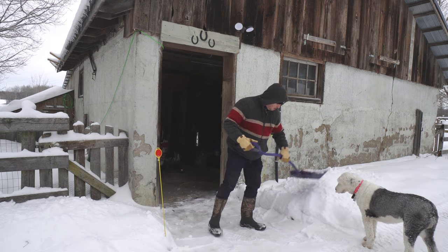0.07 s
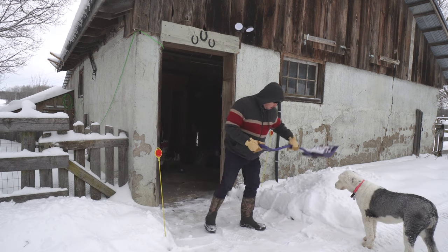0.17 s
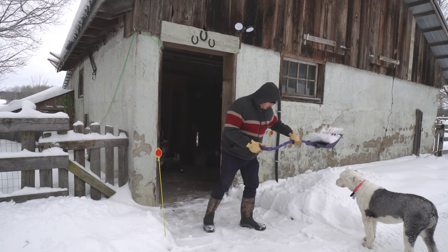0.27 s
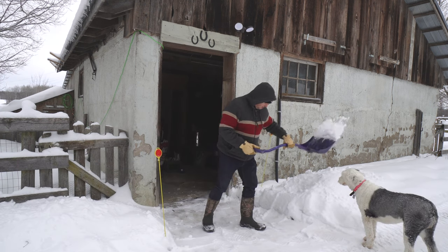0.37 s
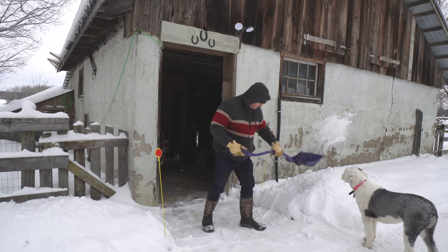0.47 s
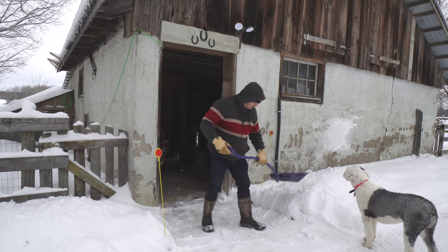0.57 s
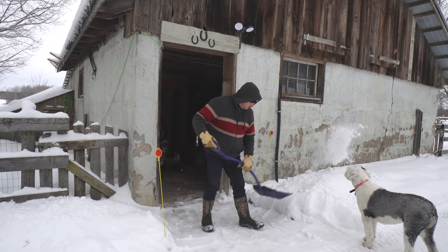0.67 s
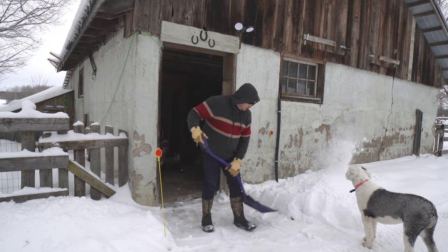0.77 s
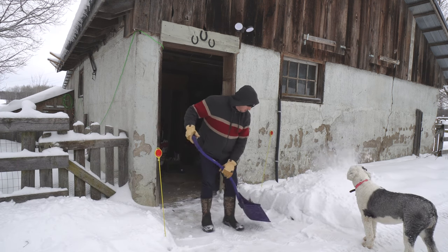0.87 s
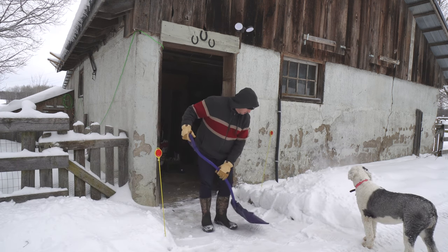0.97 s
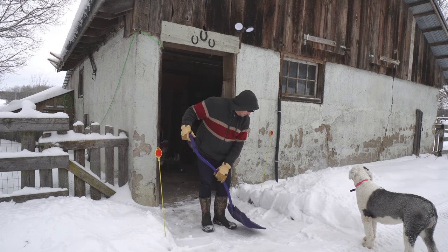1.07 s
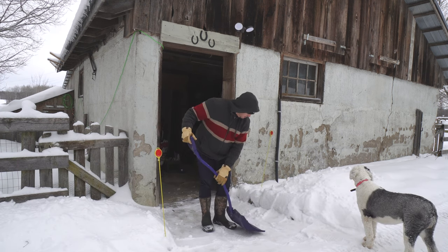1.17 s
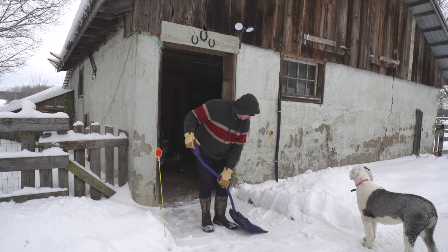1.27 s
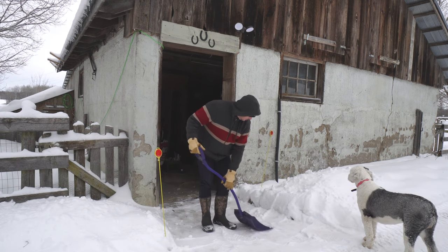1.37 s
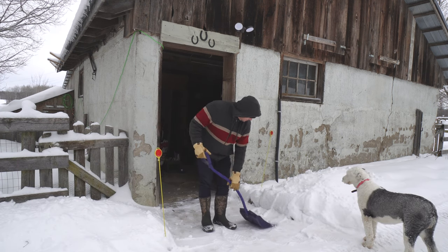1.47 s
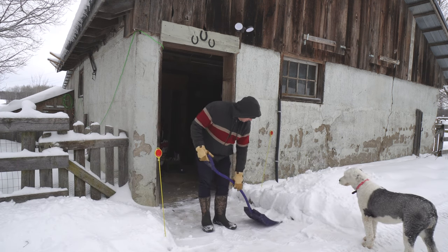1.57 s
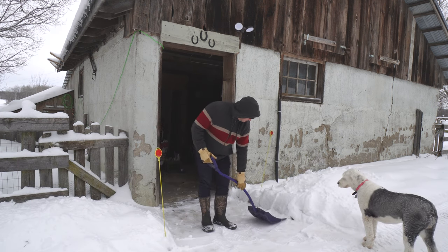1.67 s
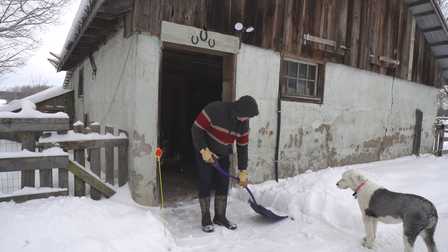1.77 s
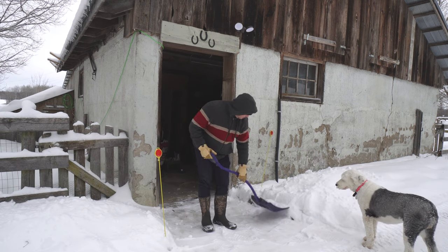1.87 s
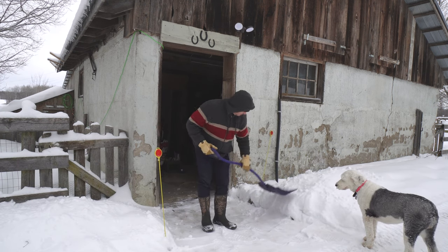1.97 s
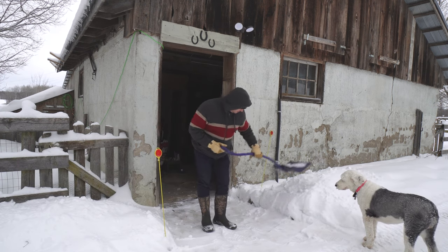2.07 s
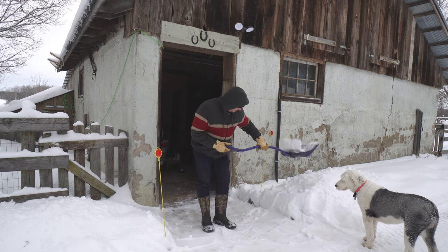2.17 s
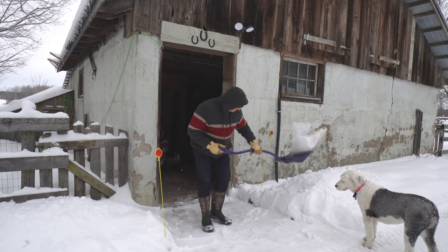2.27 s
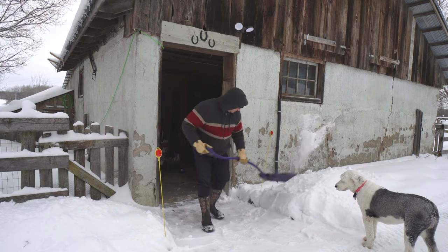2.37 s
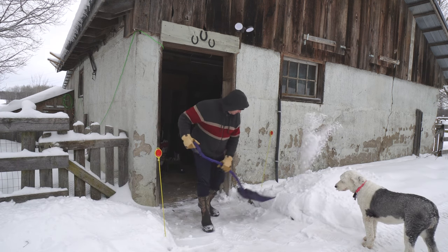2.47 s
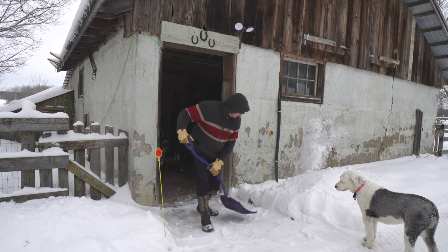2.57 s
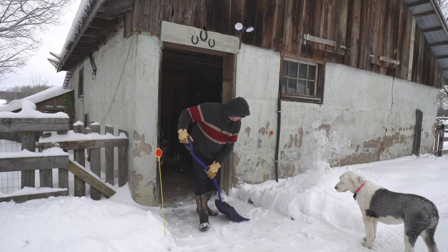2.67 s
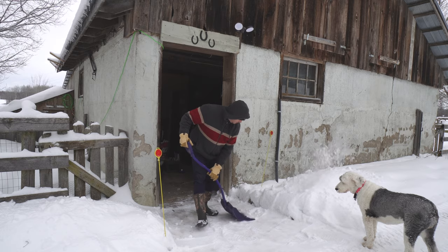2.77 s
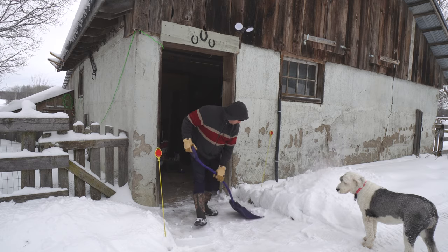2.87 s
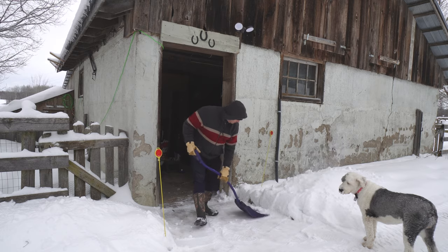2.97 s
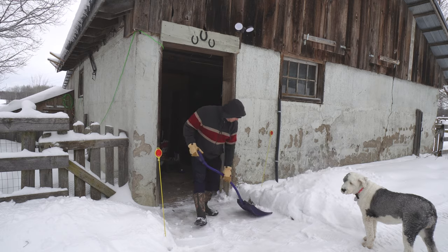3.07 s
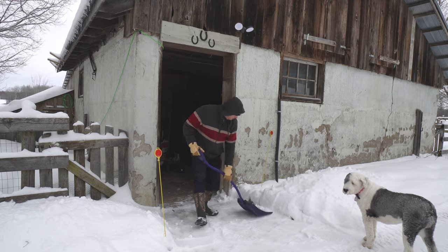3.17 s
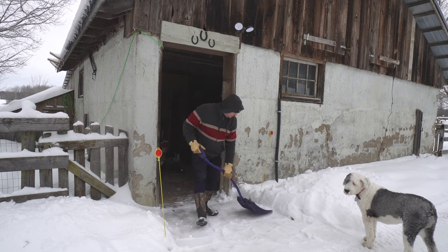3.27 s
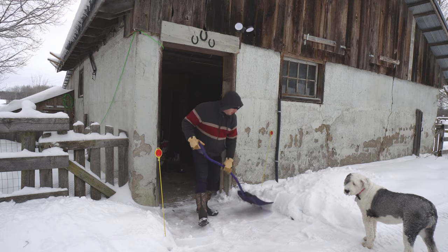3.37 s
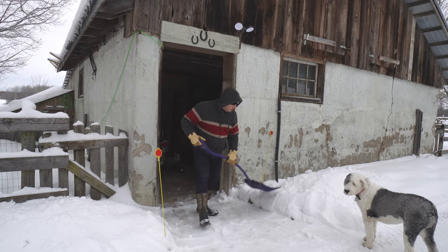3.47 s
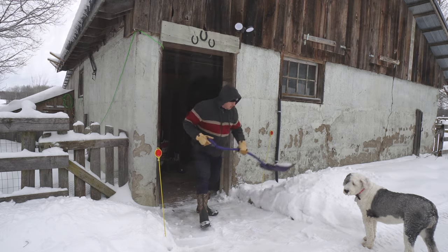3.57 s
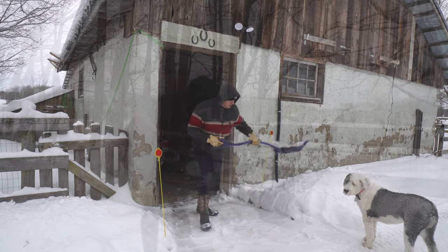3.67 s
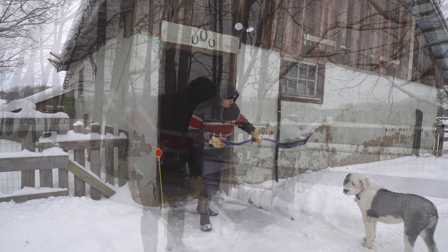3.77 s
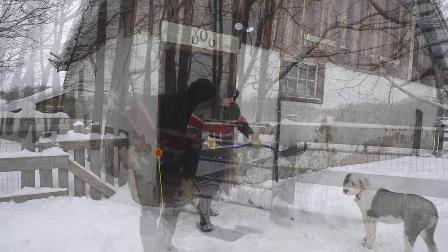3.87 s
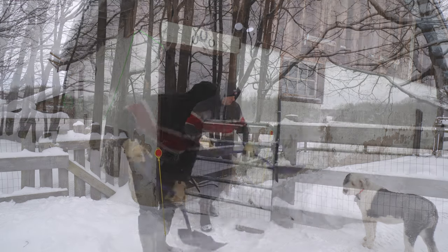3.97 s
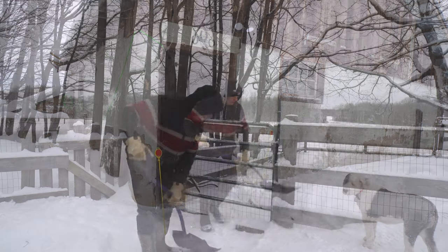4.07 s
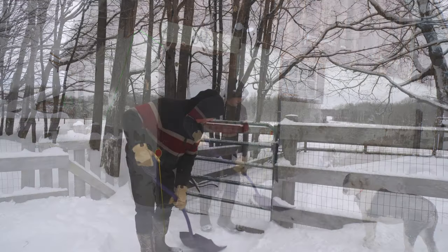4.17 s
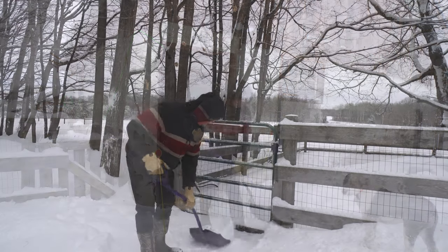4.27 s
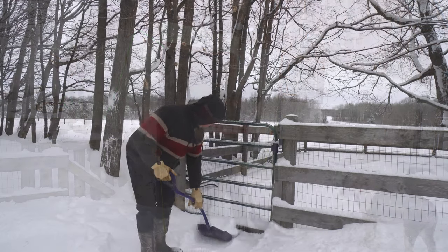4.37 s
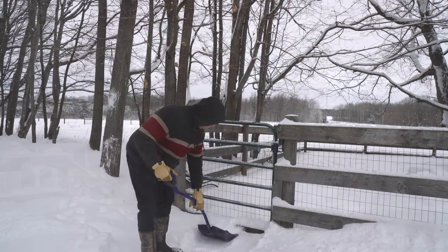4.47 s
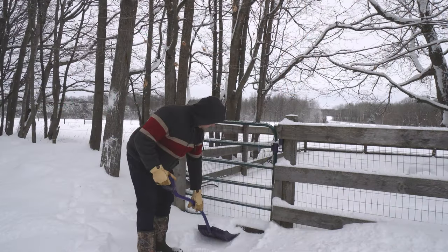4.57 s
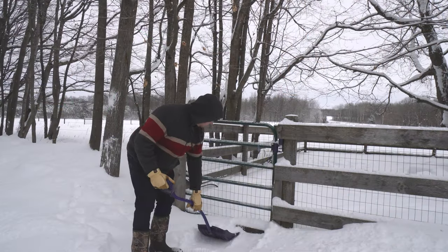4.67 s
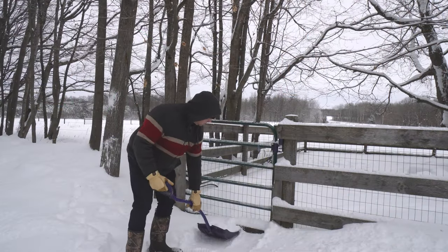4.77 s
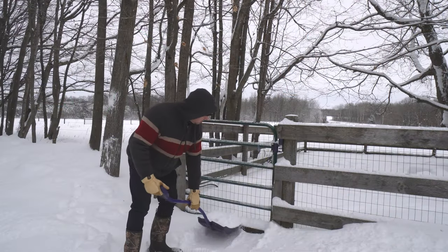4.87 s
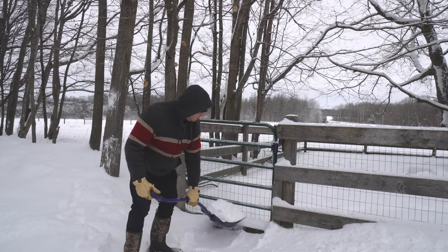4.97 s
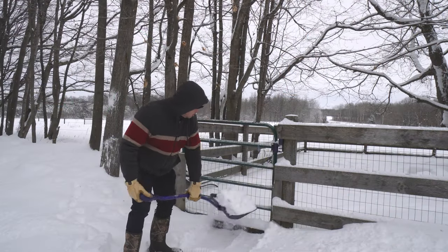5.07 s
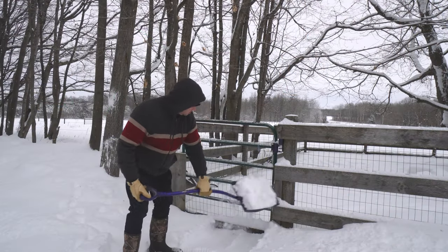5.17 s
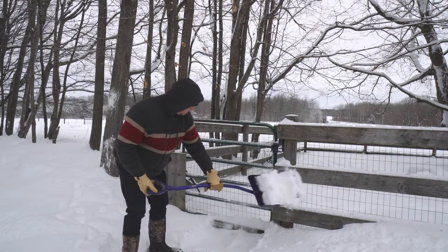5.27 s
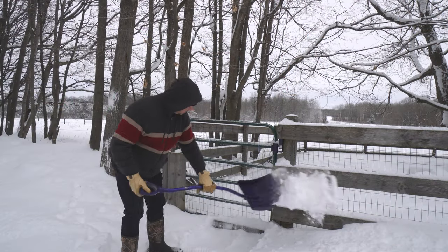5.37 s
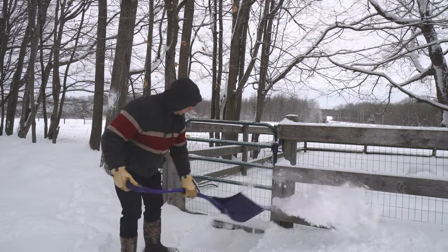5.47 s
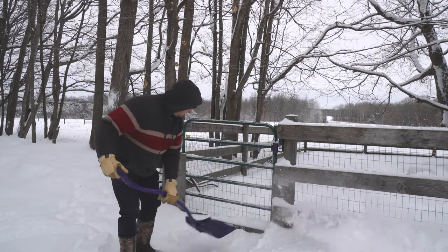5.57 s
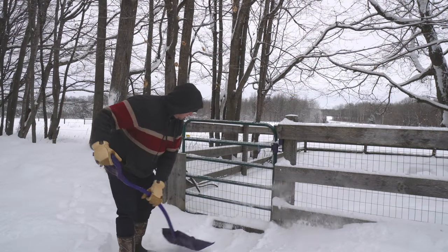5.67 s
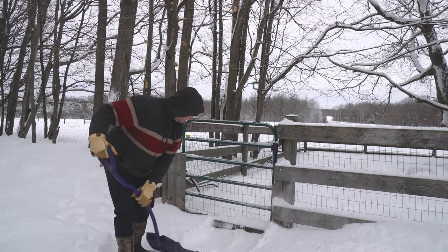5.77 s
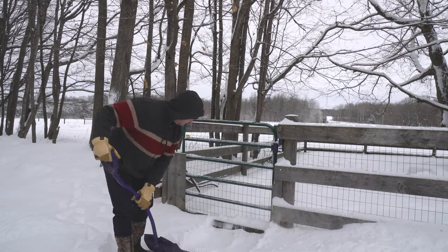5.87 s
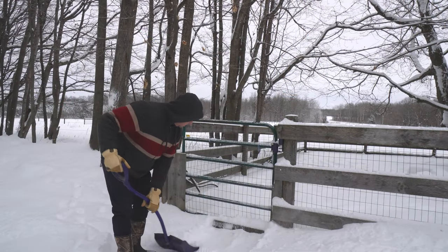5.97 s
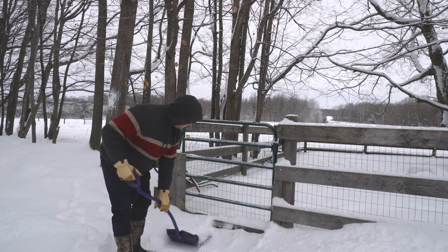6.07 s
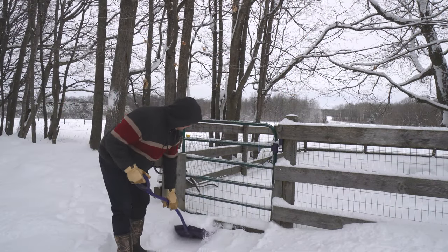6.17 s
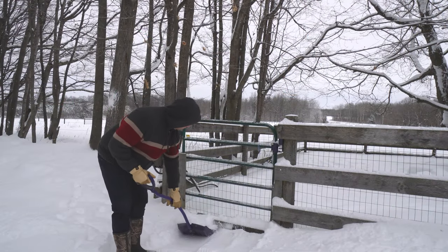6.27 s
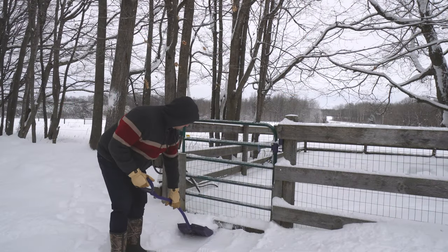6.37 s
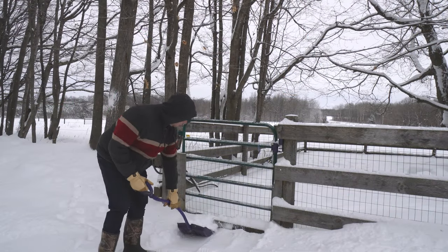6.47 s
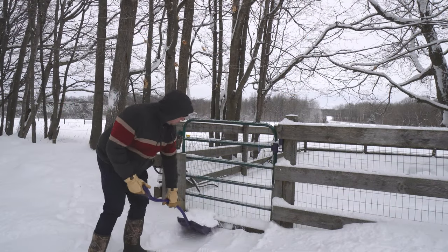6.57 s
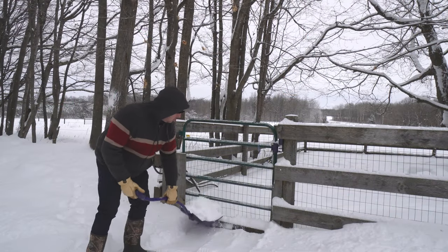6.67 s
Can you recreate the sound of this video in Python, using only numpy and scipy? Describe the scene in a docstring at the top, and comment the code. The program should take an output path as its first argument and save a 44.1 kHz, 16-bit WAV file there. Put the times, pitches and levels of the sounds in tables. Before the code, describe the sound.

A plastic shovel grinds through crusty packed snow in uneven scrapes, with hissing swishes and soft patters of thrown snow, in quiet winter air.

```python
"""Clearing packed snow on a farm

Close by, a plastic shovel works first beside a barn wall, then at a field gate. The blade grinds over the
crust in uneven pushes of crushed ice grains that ring the scoop, jerks free, and knocks once on the ground.
Sliding hiss swishes as each load swings aside, scattered crumbs and lumps patter down softly,
bits of crust click on the scoop, and faint shaped-noise wind rumbles on the microphone."""
import sys
import numpy as np
from scipy import signal
from scipy.fft import rfft, irfft
from scipy.io import wavfile

SR = 44100
rng = np.random.default_rng(int(sys.argv[2]) if len(sys.argv) > 2 else 0)


def int16_out(signal):
    """Quantize to a 16-bit WAV file."""
    q = np.round(np.clip(np.atleast_2d(signal).T, -1, 1) * 32767)
    wavfile.write(sys.argv[1], SR, q.astype(np.int16))


N = 295470   # samples, 6.7 s
TIME = np.arange(N) / SR

# resonances of the plastic scoop: pitch_hz (before tuning by the load), level_db (relative)
SCOOP_MODES = [(607.5, -48), (735, -52.5), (906, -42), (1053, -48), (1123, -51), (1254, -46.5),
               (1289, -50.5), (1455, -50.5), (1643, -48.5), (1787, -41.5), (2001, -52.5), (2164, -52),
               (2315, -45.5), (3289, -51.5), (3490, -47), (4032, -44), (4393, -54.5), (4754, -49.5),
               (5256, -48.5), (6981, -53.5)]
# tone of the packed crust by the barn: frequency_hz, level_db (relative)
BARN_CRUST = [(53, -61.5), (90, -29.5), (184, -14.5), (368, -10.5), (593, -0.5), (1190, -2.5), (2230, -0.5),
              (2890, -3.5), (8000, -10.5), (10100, -16), (12600, -12.5), (16000, -25.5)]
# tone of sliding powder, cloth and snapping crust: frequency_hz, level_db (relative)
SWISH_COLOUR = [(100, -20), (300, 0.5), (1200, 6), (4000, 4), (5800, 1.5), (8000, 0), (9500, -2.5),
                (13000, 0.5), (16000, -11.5)]


def from_db(db):
    """Decibels to gain."""
    return 10 ** (np.asarray(db) / 20)


def rms_one(x):
    """Scale to unit rms."""
    return x / np.sqrt(np.mean(x ** 2) + 1e-20)


def butter(x, hz, kind):
    """Second-order Butterworth filter."""
    return signal.sosfilt(signal.butter(2, hz, kind, fs=SR, output="sos"), x)


def resonate(x, hz, width_hz):
    """One resonance with unit gain at its peak."""
    b, a = signal.iirpeak(hz, hz / width_hz, fs=SR)
    return signal.lfilter(b, a, x)


def colour(x, spectrum, size=4096):
    """Causal (minimum-phase) filter shaped like the spectrum; white noise keeps its power."""
    hz, db = np.transpose(spectrum)
    bins = np.maximum(np.fft.rfftfreq(size, 1 / SR), 1)
    gain = from_db(np.interp(np.log(bins), np.log(hz), db))
    # folding the cepstrum onto positive times makes the filter causal
    cepstrum = irfft(np.log(gain))
    cepstrum[1:size // 2] *= 2
    cepstrum[size // 2 + 1:] = 0
    response = irfft(np.exp(rfft(cepstrum)))
    return signal.fftconvolve(x, response / np.linalg.norm(response))[:N]


def drift(rate):
    """Smooth random wander of rms 1, with about `rate` turns a second."""
    knots = np.cumsum(rng.uniform(.5, 1.5, N // 20)) / rate - 1
    return rms_one(np.interp(TIME, knots, rng.standard_normal(len(knots))))


def grains(per_s, spread_db):
    """Random fractures of uneven size and either sign; rms 1."""
    sizes = from_db(spread_db * np.minimum(rng.exponential(1, N), 4))
    signs = rng.choice([-1, 1], N)
    happens = rng.random(N) < per_s / SR
    return rms_one(sizes * signs * happens)


def puff(x, hz):
    """A heavily damped resonance; white noise keeps its power."""
    q = 3
    return resonate(x + 1e-18, hz, hz / q) * np.sqrt(SR * q / (np.pi * hz))


def bursts(rows, attack_s=0):
    """Sudden starts that die away, from rows of start_s, level_db, decay_s (time to fall 60 dB)."""
    power = np.zeros(N)
    age = TIME[:SR // 4]
    attack = np.minimum((age + 1 / SR) / max(attack_s, 1 / SR), 1)
    for start_s, db, decay_s in rows:
        at = int(start_s * SR)
        burst = attack * from_db(db - 60 * age / max(decay_s, .002))
        power[at:at + len(age)] += burst[:N - at] ** 2
    return np.sqrt(power)


def strokes(rows, stop_db_per_s, levels_db=0):
    """Each movement gathers to its peak, changes level as it slides on, then stops; the strongest one leads."""
    rise_power = 1.134
    gain = np.zeros(N)
    for row, more_db in zip(rows, np.broadcast_to(levels_db, len(rows))):
        peak_s, rise_s, slide_s, db, fade_db = row[:5]
        age = TIME - peak_s
        slide_s = max(slide_s, .001)
        attack = np.clip(1 + age / max(rise_s, .001), 0, 1) ** rise_power
        sliding_db = fade_db * np.clip(age / slide_s, 0, 1)
        stopping_db = stop_db_per_s * np.clip(age - slide_s, 0, .5)
        gain = np.maximum(gain, attack * from_db(db + more_db - sliding_db - stopping_db))
    return gain


def outdoors(air_db, wind_db, gust_db):
    """Still winter air and a little gusty wind on the microphone, both as shaped noise."""
    # tone of the open air: frequency_hz, level_db (relative)
    air_colour = [(20, 19.5), (50, 2), (120, 4), (330, 6.5), (560, 1.5), (750, -2.5), (1600, -2.5),
                  (4000, -10.5), (8000, -15.5), (12500, -14.5), (16000, -22.5)]
    # low rumble of wind on the microphone: frequency_hz, level_db (relative)
    wind_colour = [(8, 8.5), (20, 5.5), (32, -5), (60, -5), (120, -8.5), (250, -19), (600, -48)]
    # strength of the breeze: time_s, level_db (relative)
    breeze = [(0.0, -82), (0.2, -68), (1.5, -64.5), (1.92, -75.5), (4.83, -62.5), (5.02, -67),
              (5.71, -60.5), (6.31, -59.5), (6.55, -56)]
    breeze_db = wind_db + np.interp(TIME, *np.transpose(breeze)) + gust_db * drift(6)
    wind = from_db(breeze_db) * colour(rng.standard_normal(N), wind_colour)
    air = from_db(air_db) * colour(rng.standard_normal(N), air_colour)
    return wind + air


def yard(x, wet_db, t60):
    """Snow soaks up most sound; walls, fence and trees scatter a faint, dull tail."""
    age = TIME[:SR // 2]
    tail = butter(rng.standard_normal(len(age)), 1800, "low") * from_db(-60 * age / t60)
    tail = tail * (age > .005)   # the first 5 ms stay dry
    return x + from_db(wet_db) * signal.fftconvolve(x, tail / np.linalg.norm(tail))[:N]


def falling_snow(patter_db, lump_db, clump_db, lump_s, dull_db, impact_db):
    """Crumbs come down in clusters; each lump lands with a dull puff of its own pitch."""
    # showers of loose snow landing or packing under boots:
    # peak_s, rise_s, slide_s, level_db (relative), fade_db (over the slide)
    showers = [ (.17, .4, 0.99, -56.5, 5.5), (.94, 0.34, 0.14, -48, 6), (2.25, 0.21, 0.24, -73, 7),
               (2.66, 0.18, 0.16, -56.5, 6), (3.19, 0.039, 0.15, -60.5, 3.5), (3.78, 0.35, 0.2, -61, 9),
               (4.48, 0.022, 0.12, -56, 15), (4.82, 0.78, .13, -65, 1), (5.33, 0.72, 0.63, -63.5, 14.5),
               (6.42, 0.027, 0.21, -63.5, 5), (6.68, 0.1, 0.015, -48.5, 27)]
    # larger lumps landing: start_s, level_db (relative), pitch_hz
    lump_landings = [(0.185, -50, 1070), (.59, -45.5, 596), (0.643, -42, 684), (.678, -45.5, 573),
                     (.825, -34, 443), (0.833, -31.5, 970), (1.017, -43.5, 680), (2.248, -47.5, 1100),
                     (2.637, -47, 696), (2.705, -54, 740), (3.671, -46.5, 523), (3.701, -44, 950),
                     (3.827, -49, 420), (3.863, -48, 415), (3.895, -46.5, 560), (3.929, -44.5, 417),
                     (3.987, -44.5, 570), (5.174, -51, 522), (5.19, -45.5, 473), (5.347, -43.5, 1330),
                     (5.4, -46, 410), (5.432, -48, 920)]
    # tone of soft snow: frequency_hz, level_db (relative)
    soft_snow = [(80, -16), (160, -8.5), (250, -1.5), (420, -2.5), (600, 0), (800, -3), (1300, -7.5),
                 (2000, -15.5), (4000, -22), (16000, -50.5)]
    clusters = from_db(patter_db + clump_db * drift(80)) * strokes(showers, stop_db_per_s=449)
    crumbs = clusters * grains(per_s=900, spread_db=1.4)
    packing = grains(per_s=14000, spread_db=3.1)
    lumps = 0
    for start_s, db, pitch_hz in lump_landings:
        landing = bursts([(start_s, db, lump_s)]) * packing
        landing[int(start_s * SR)] += from_db(db + impact_db)   # first contact
        lumps = lumps + from_db(lump_db) * puff(landing, pitch_hz)
        crumbs = crumbs + from_db(dull_db) * landing
    return colour(crumbs, soft_snow) + butter(lumps, 1900, "low")


def swish(level_db, flutter_db, crystal_db):
    """Powder and cloth slide with a fine hiss; single crystals tick in it."""
    # swings of the shovel and body, with sliding snow and cloth, and a brief bright hiss after the knock at
    # 4.935 s: # peak_s, rise_s, slide_s, level_db (relative), fade_db (over the slide; negative grows)
    swings = [ (.11, 0.27, 0.26, -50, 12), (.39, 0.14, 0.038, -45, 6), (.48, .05, 0.36, -75.5, -6),
              (.92, 0.29, 0.14, -52.5, 3.5), (2.06, .17, 0.12, -54, 2.5), (2.255, .08, 0.021, -58.5, 4),
              (2.53, 0.014, 0.064, -55.5, 12), (2.7, 0.31, 0.07, -70.5, -7), (3.19, .05, 0.23, -67, -5.5),
              (3.61, 0.35, 0.27, -57, 11.5), (4.475, 0.017, 0.26, -54, 22.5),
              (4.78, 0.074, 0.11, -53, 11.5), (4.935, .015, 0.062, -63, 12), (5.23, 0.21, .05, -68, 4),
              (5.33, 0.018, 0.29, -63, 14), (5.5, 0.053, .06, -71.5, 3), (5.66, .09, 0.059, -63.5, 4),
              (6.38, 0.044, 0.092, -74.5, 7), (6.52, .035, .04, -54, 18), (6.665, 0.23, .012, -55.5, 9)]
    crystals = from_db(crystal_db) * grains(per_s=150, spread_db=6.0)
    hiss = grains(per_s=18000, spread_db=1.5) + crystals
    flutter = from_db(level_db + flutter_db * drift(90))
    return flutter * strokes(swings, stop_db_per_s=449) * colour(hiss, SWISH_COLOUR)


def knock(level_db, tail_db, tail_s):
    """A very faint, brief burst of noise leads in; then the edge hits hard ground three times within a few
    milliseconds; a dull puff follows."""
    # a faint lead-in, then contacts of the edge with frozen ground: start_s, level_db (relative), decay_s
    contacts = [(4.909, -55, 0.035), (4.9122, -24.5, 0.029), (4.9150, -19.5, 0.023), (4.918, -19.5, 0.015)]
    # tone of the struck blade: frequency_hz, level_db (relative)
    knock_colour = [(100, -9), (450, -11), (590, 7.5), (760, -20), (950, 1), (1280, 0.5), (1550, -16),
                    (1950, -18), (2300, -0.5), (3700, -4), (4400, 5.5), (5400, -9), (8300, -9),
                    (16000, -30)]
    hits = colour(bursts(contacts) * grains(per_s=23000, spread_db=2), knock_colour)
    dull_noise = rms_one(butter(rng.standard_normal(N), [600, 1400], "band"))
    tail = bursts([(contacts[-1][0], tail_db, tail_s)]) * dull_noise
    return from_db(level_db) * hits + tail


def snaps(level_db, top_hz, attack_s, decay_s, tick_db):
    """Each piece of crust breaks in a short volley of cracks, with a faint pitch of its own."""
    # small bits of crust clicking on the scoop: start_s, level_db (relative), pitch_hz
    crust_bits = [(.184, -41.5, 2000), (.4188, -40, 3000), (3.701, -43.5, 5500), (3.743, -48.5, 5000),
                  (3.783, -36, 6460), (3.799, -37, 6740), (4.358, -41, 7000), (4.5368, -38.5, 3700),
                  (4.7068, -44.5, 4000), (4.814, -37, 1970), (4.8488, -46, 3200), (4.8765, -43.5, 7800),
                  (5.3128, -43, 2500), (5.348, -50, 2200), (5.3708, -42.5, 7000), (5.846, -52, 7040),
                  (6.4303, -40.5, 3500), (6.451, -43.5, 5020), (6.6758, -39.5, 4930)]
    fractures = grains(per_s=20000, spread_db=3.0)
    cracks = 0
    for start_s, db, pitch_hz in crust_bits:
        volley = bursts([(start_s, db, decay_s)], attack_s) * fractures
        cracks = cracks + volley + from_db(tick_db) * puff(volley, pitch_hz)
    return from_db(level_db) * butter(colour(cracks, SWISH_COLOUR), [900, min(top_hz, .45 * SR)], "band")


def catches(level_db, attack_s):
    """The edge catches on ice and breaks through: short, dense bursts of fractures as it jerks free."""
    # moments of breaking free: start_s, level_db (relative), decay_s
    jerks = [(1.282, -28.5, 0.055), (1.562, -10.5, 0.14), (1.641, -12.5, 0.069), (1.81, -26, 0.037),
             (1.885, -28, 0.088), (1.923, -35, 0.069), (2.761, -31, 0.08), (2.869, -19, 0.05),
             (3.282, -32, 0.065), (4.389, -43, 0.13), (4.444, -8, 0.022), (4.776, -34, 0.06),
             (6.22, -20.5, 0.081), (6.239, -21.5, 0.21)]
    fractures = bursts(jerks, attack_s) * grains(per_s=15000, spread_db=-2.5)
    return from_db(level_db) * colour(fractures, BARN_CRUST)


def blade(force, ring_db, pitch, width_hz=24, loss=0.006, shift_db=3):
    """The scoop rings at its modes, each driven more or less as the contact point moves; power is kept."""
    out = force.copy()
    strongest = max(db for hz, db in SCOOP_MODES)
    for hz, db in SCOOP_MODES:
        drive = from_db(ring_db + db - strongest + shift_db * drift(25))
        # higher modes lose energy faster, so they are wider
        out += resonate(drive * force + 1e-18, hz * pitch, pitch * (width_hz + loss * hz))
    return out * np.std(force) / np.std(out)


def ring_on(x, pitch, level_db, width_hz=13):
    """The scoop keeps ringing for a moment after it leaves the ground."""
    strongest = max(db for hz, db in SCOOP_MODES)
    rings = 0
    for hz, db in SCOOP_MODES:
        rings = rings + from_db(db - strongest) * resonate(x + 1e-18, hz * pitch, pitch * width_hz)
    return x + from_db(level_db) * rings


def scrape(pushes, crust, pitch, per_s, spread_db, judder_db, ring_db, after_db,
           boom_db, rasp_db, grit_db, crunch_db, patchy_db):
    """The edge crushes thousands of ice grains a second, catching and slipping; the scoop radiates them."""
    push_boom_db, push_grit_db = np.transpose(pushes)[-2:]
    catching = from_db(judder_db * drift(130))
    crunch = from_db(crunch_db) * grains(per_s=450, spread_db=2.0)   # fewer, larger lumps give way too
    crushing = grains(per_s, spread_db) + crunch
    radiated = colour(blade(crushing, ring_db, pitch), crust)

    def crushed(hz, kind, levels_db):
        """One range of grain sizes, following the pushes but also coming and going on its own."""
        band = signal.sosfiltfilt(signal.butter(2, hz, kind, fs=SR, output="sos"), radiated)
        patches = from_db(patchy_db * drift(70))
        return rms_one(band) * patches * strokes(pushes, stop_db_per_s=998.5, levels_db=levels_db)

    # a deep bite flexes the whole scoop, a light skim leaves mostly grit
    boom = crushed(850, "low", boom_db + push_boom_db)
    rasp = crushed([850, 4200], "band", rasp_db)
    grit = crushed(4170, "high", grit_db + push_grit_db)
    return ring_on(catching * (boom + rasp + grit), pitch, after_db)


def gate_scrape():
    """At the field gate the scoop carries a light load, so its modes ring a little higher."""
    # pushes of the blade: peak_s, rise_s, slide_s, level_db (relative), fade_db (over the slide),
    # boom_db (of the scoop, relative), grit_db (icy, relative)
    pushes = [ (4.236, 0.073, .035, -49, 1.5, -8, 2), (4.296, 0.055, 0.076, -37.5, 11.8, -9.5, 0.5),
              (4.398, 0.025, 0.012, -38, .5, -12, 4.5), (4.434, 0.026, 0.0061, -25.3, 0.83, -9, -0.5),
              (4.785, 0.051, 0.036, -44.5, 3.8, -24.5, -12), (6.0, 0.033, 0.034, -35, .5, -14.5, 1),
              (6.04, 0.097, 0.053, -38, 5.5, -14, -2.5), (6.11, 0.035, .03, -42, 4.7, -11, 2.5),
              (6.17, 0.07, 0.051, -39, 3.5, -10.5, -0.5), (6.228, 0.017, 0.023, -35.5, 1.8, -5.5, -8),
              (6.285, 0.033, 0.061, -32, 7.2, -7.5, -3.5)]
    # tone of the crust at the gate: frequency_hz, level_db (relative)
    crust = [(88, -35), (150, -13), (290, -3.5), (398, -6), (484, -2.5), (545, -3), (624, 2.5), (854, -3.5),
             (941, 3), (1170, -1), (2270, 2), (4080, -6.5), (8070, -14), (9820, -19), (12700, -13),
             (16000, -31)]
    return scrape(pushes, crust, pitch=1.046, per_s=17000, spread_db=1.5, judder_db=1.0,
                  ring_db=-17.5, after_db=-11, boom_db=-2.5, rasp_db=-5.5, grit_db=-3,
                  crunch_db=-5, patchy_db=1.28)


def barn_scrape():
    """Beside the barn wall the scoop carries a heavy load and its modes keep their listed pitch."""
    # pushes of the blade: peak_s, rise_s, slide_s, level_db (relative), fade_db (over the slide),
    # boom_db (of the scoop, relative), grit_db (icy, relative)
    pushes = [ (1.36, 0.051, 0.064, -25, 3.5, -13, -4.5), (1.486, 0.064, 0.033, -28, 0, -10.5, -3.5),
              (1.56, .11, 0.11, -20, 15.5, -13, -4.5), (1.70, 0.063, 0.079, -29, 1.5, -10, -4),
              (1.816, 0.023, 0.0088, -30.5, 1, -2, 2), (1.864, 0.047, 0.013, -39, 8, -8, -1),
              (1.926, 0.067, 0.0054, -36, 4, -19, 0.5), (2.789, 0.034, 0.095, -25.5, 23.5, -9.5, -4),
              (2.904, 0.045, 0.078, -21, 5, -8, -5.5), (3.022, 0.075, 0.14, -30.5, 9.5, -16, -4),
              (3.298, 0.031, 0.063, -37.5, 9.5, -14, -6.5)]
    return scrape(pushes, BARN_CRUST, pitch=1, per_s=16000, spread_db=2.5, judder_db=1.13,
                  ring_db=-2.5, after_db=-10.5, boom_db=-1.7, rasp_db=-5.5, grit_db=-3.0,
                  crunch_db=-7.5, patchy_db=0.02)


def scene():
    """Shovel and snow sound in the yard, with air and wind added at the microphone; one channel."""
    background = outdoors(air_db=-66.0, wind_db=5.5, gust_db=2.35)
    snow = falling_snow(patter_db=-1.5, lump_db=-6.0, clump_db=2.0, lump_s=0.037, dull_db=-7.5, impact_db=4)
    snow = snow + swish(level_db=-0.7, flutter_db=1.6, crystal_db=-13)
    shovel = knock(level_db=-1.8, tail_db=-37, tail_s=0.059)
    shovel = shovel + snaps(level_db=-6.5, top_hz=11150, attack_s=0.00034, decay_s=0.032, tick_db=-10)
    shovel = shovel + catches(level_db=-10.5, attack_s=0.00066)
    shovel = shovel + gate_scrape() + barn_scrape()
    return yard(shovel + snow, wet_db=-28.5, t60=0.36)[None] + background


def record(dry):
    """The microphone port lifts one treble band and hollows the next; the top is cut."""
    cutoff_hz = 15900
    lifted = dry + 0.85 * resonate(dry, hz=8100, width_hz=1500)
    hollowed = lifted - 0.48 * resonate(lifted, hz=9900, width_hz=1900)
    return signal.sosfilt(signal.ellip(12, .1, 80, cutoff_hz, fs=SR, output="sos"), hollowed)


dry = scene()
out = record(dry)
int16_out(out)
```